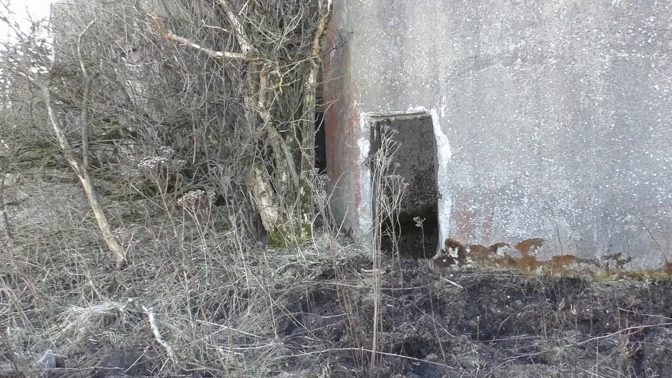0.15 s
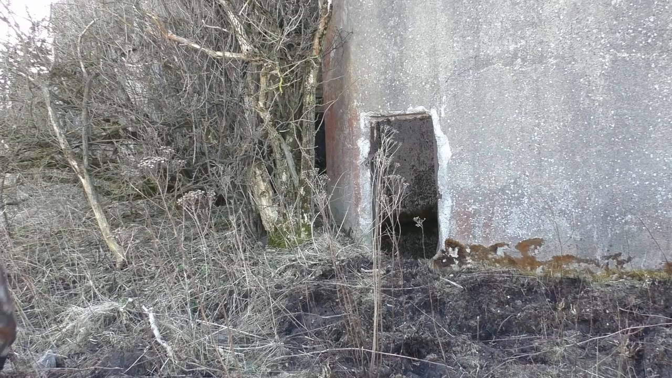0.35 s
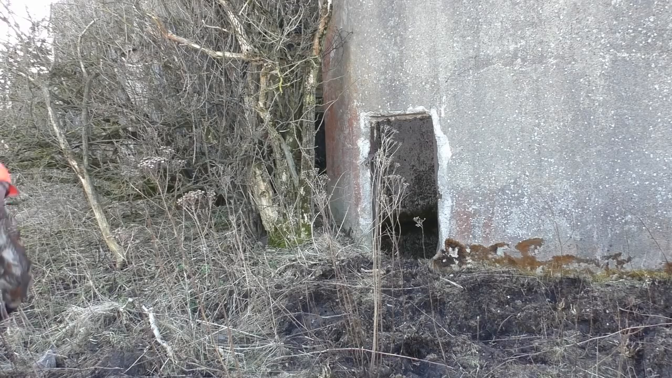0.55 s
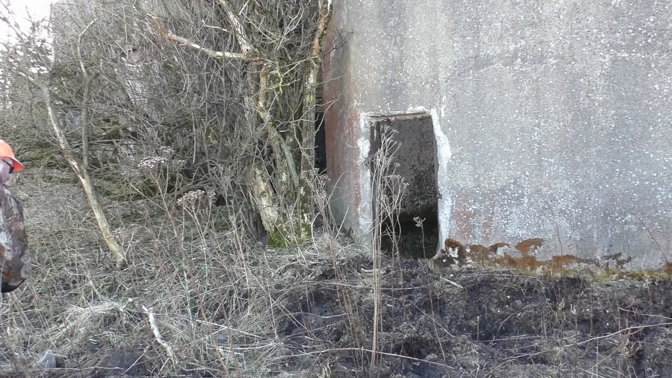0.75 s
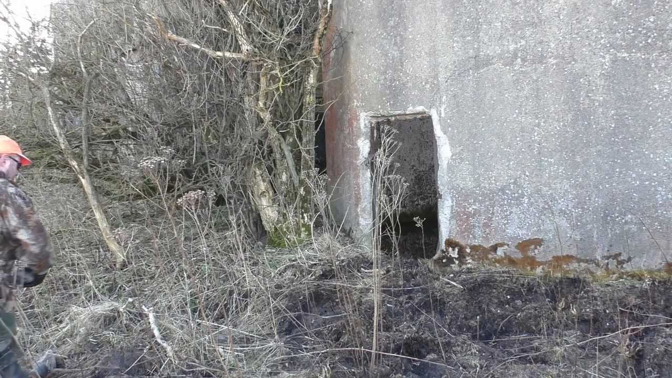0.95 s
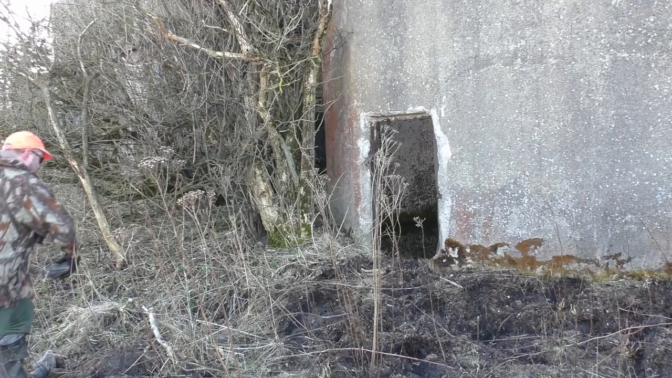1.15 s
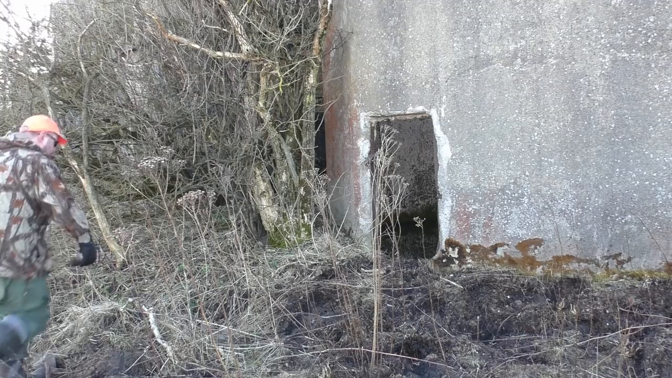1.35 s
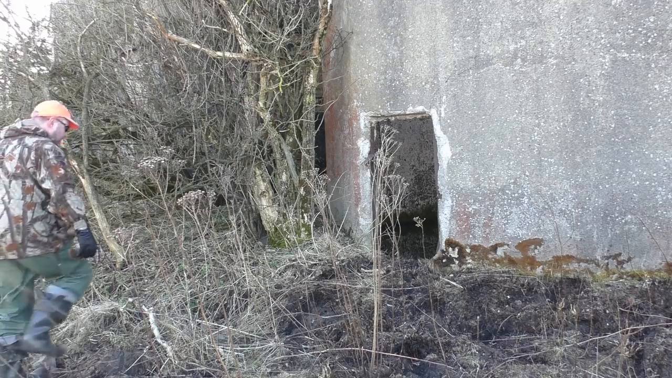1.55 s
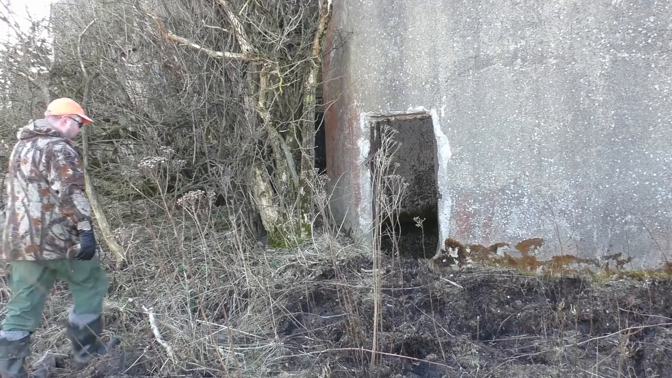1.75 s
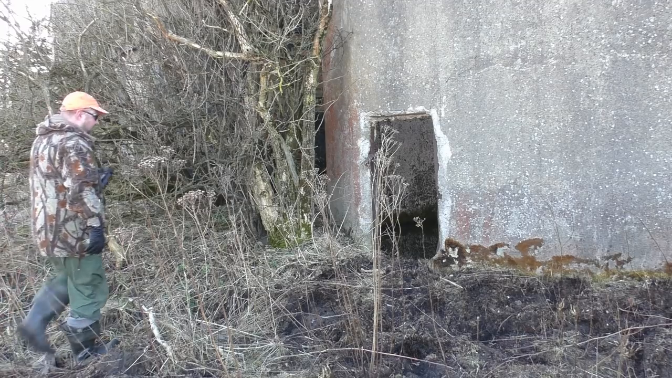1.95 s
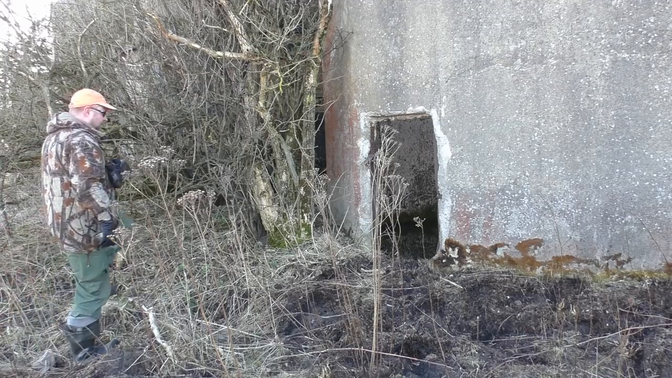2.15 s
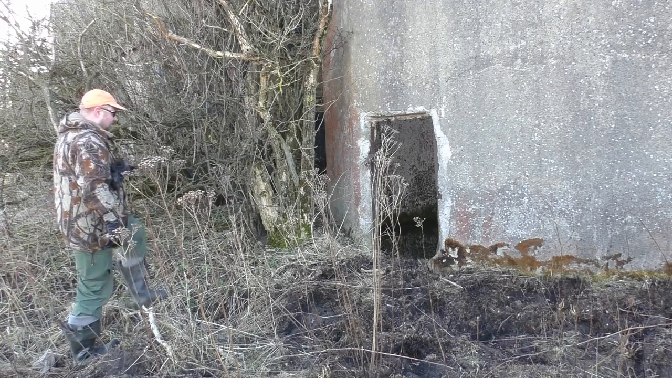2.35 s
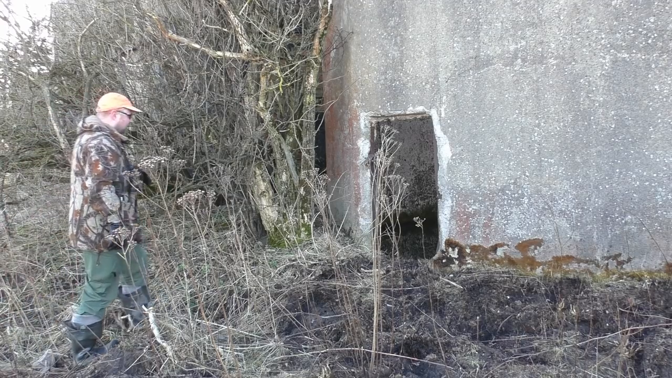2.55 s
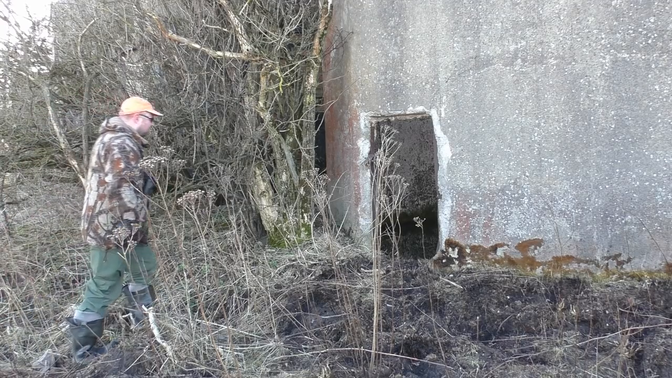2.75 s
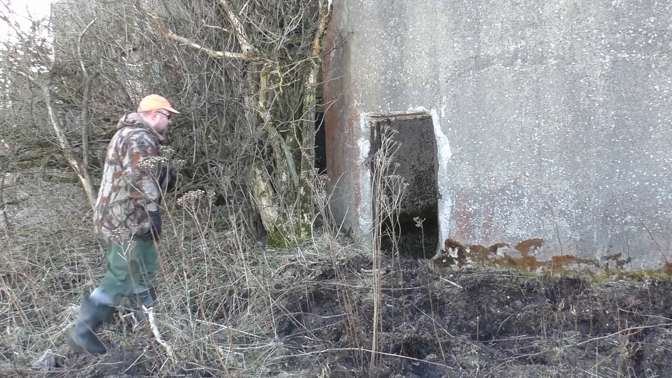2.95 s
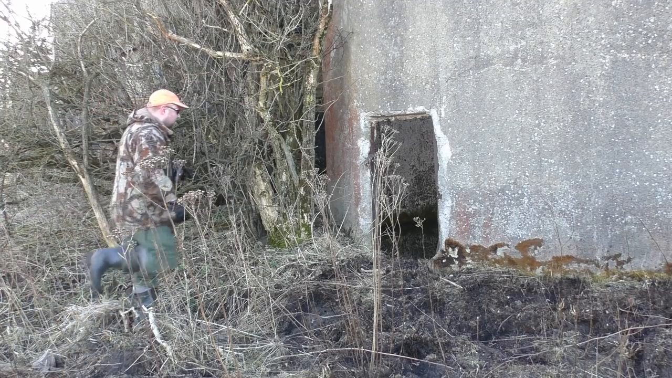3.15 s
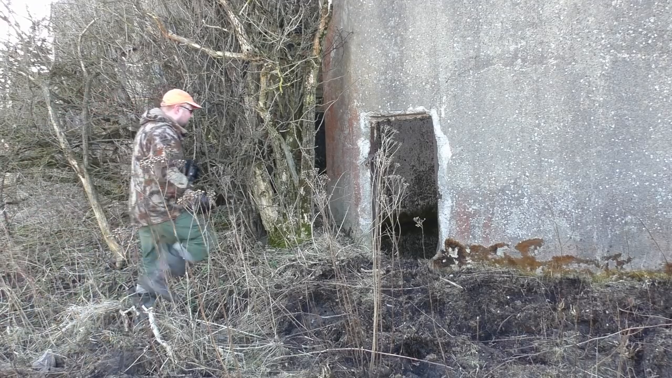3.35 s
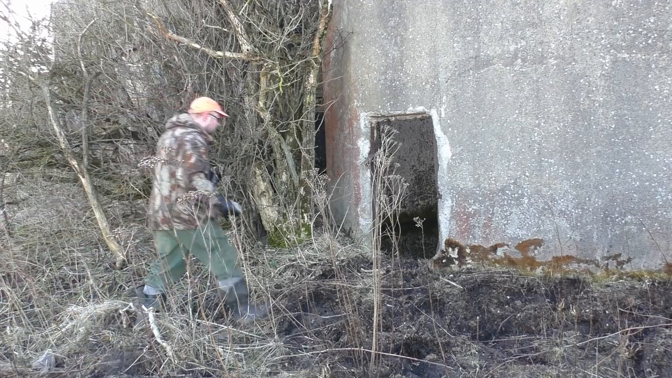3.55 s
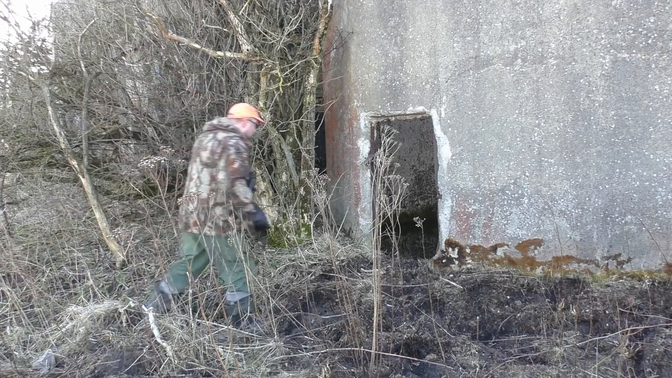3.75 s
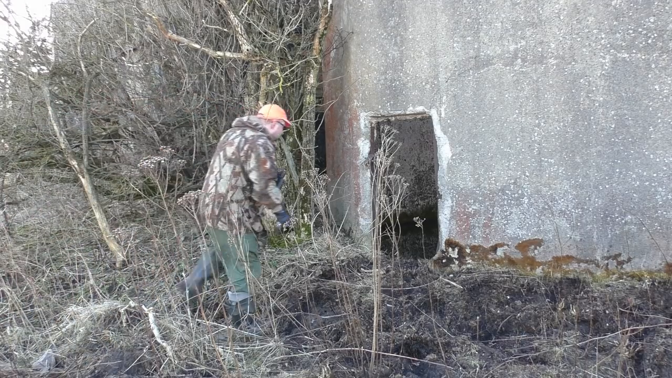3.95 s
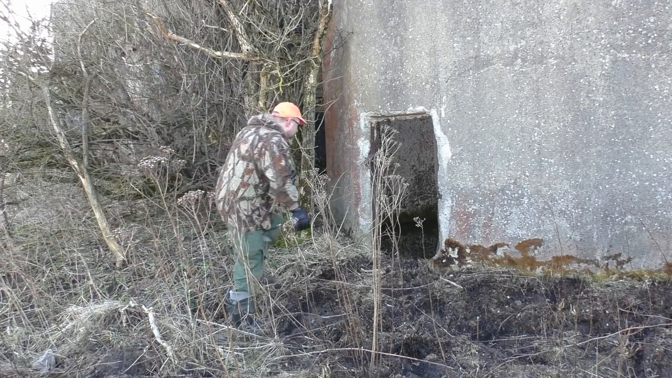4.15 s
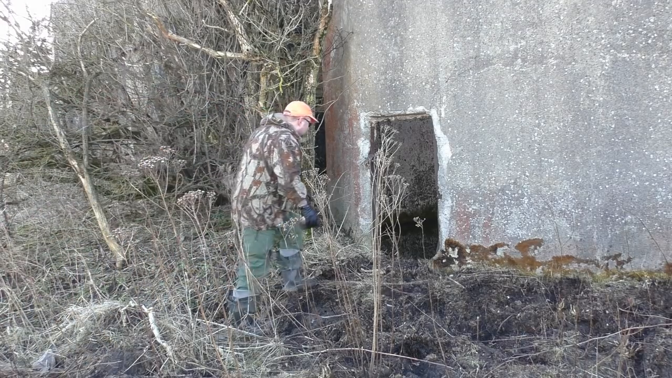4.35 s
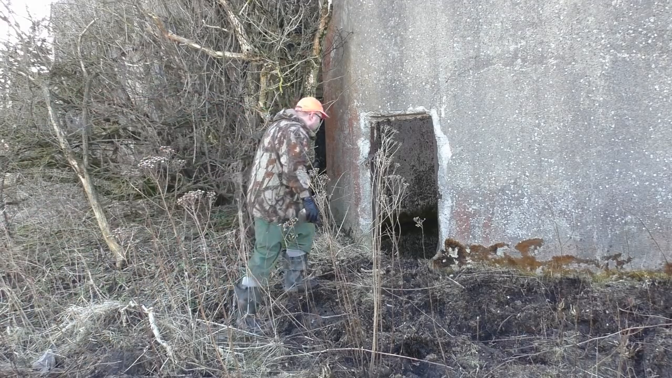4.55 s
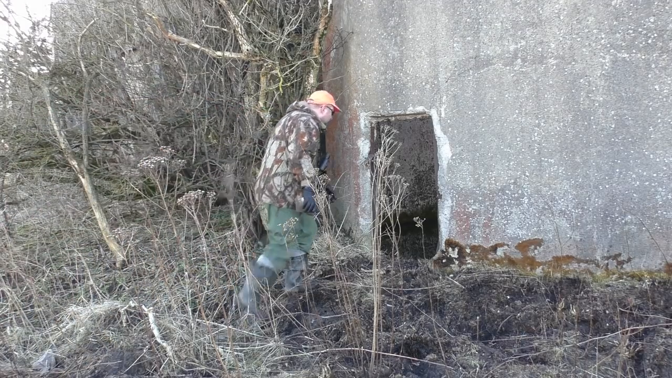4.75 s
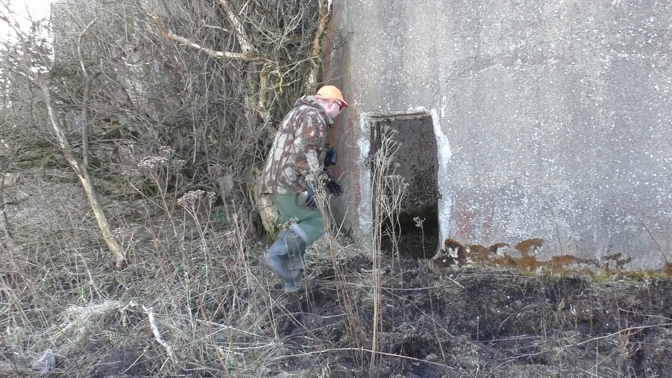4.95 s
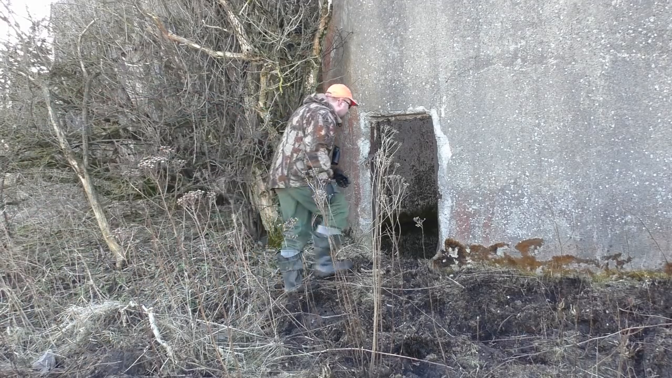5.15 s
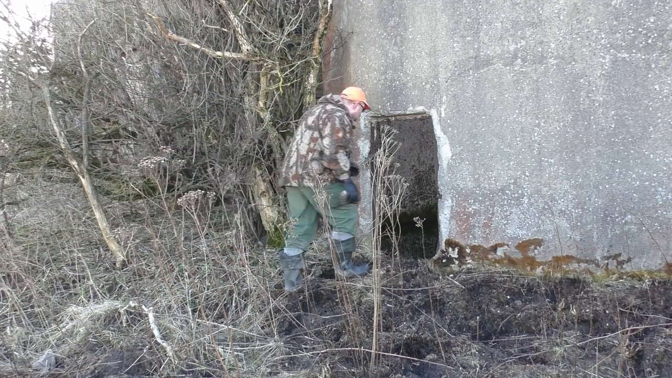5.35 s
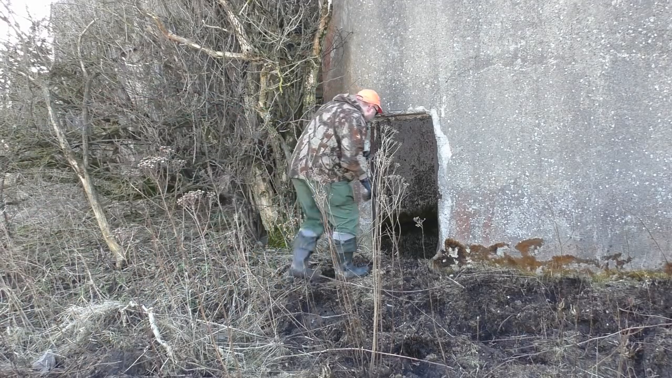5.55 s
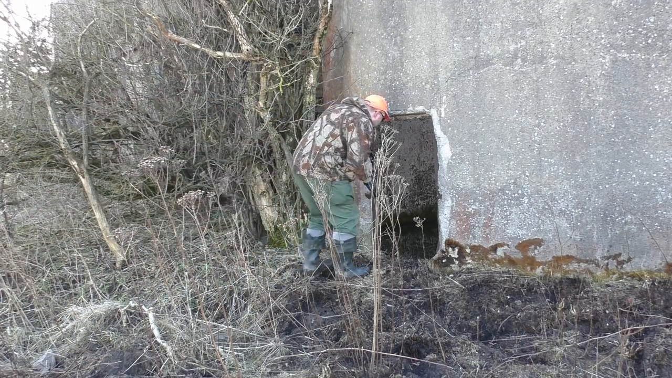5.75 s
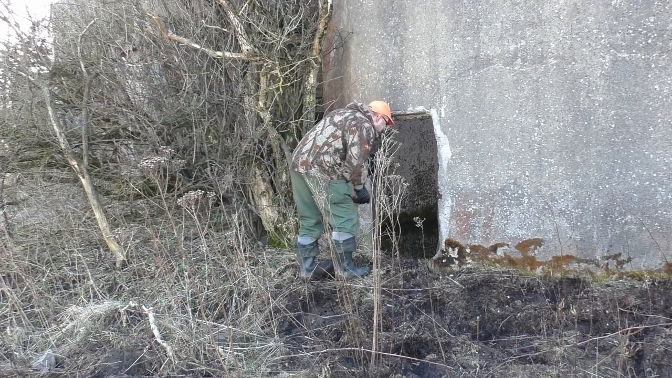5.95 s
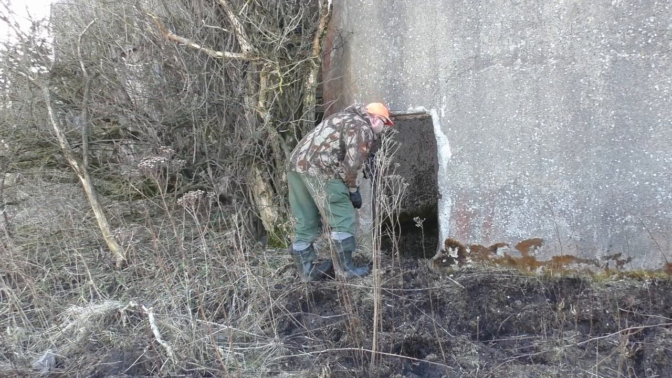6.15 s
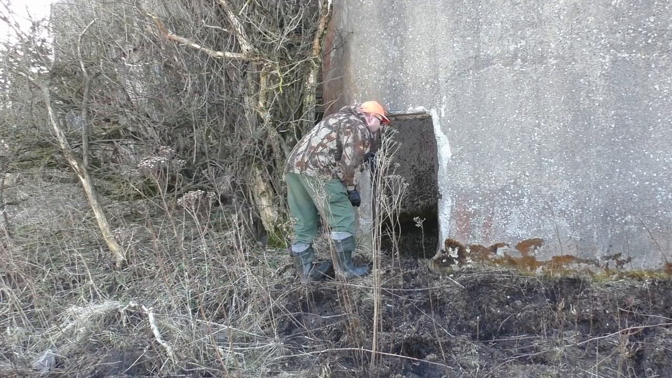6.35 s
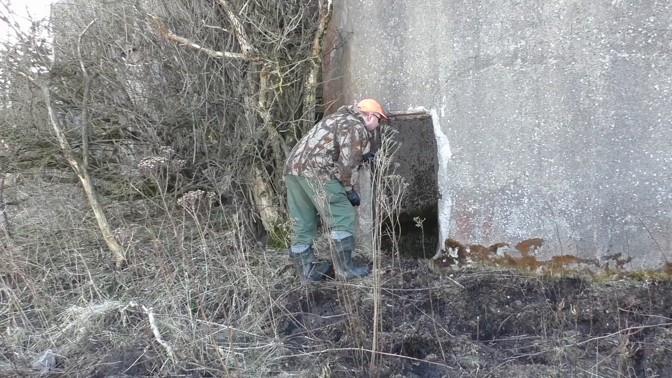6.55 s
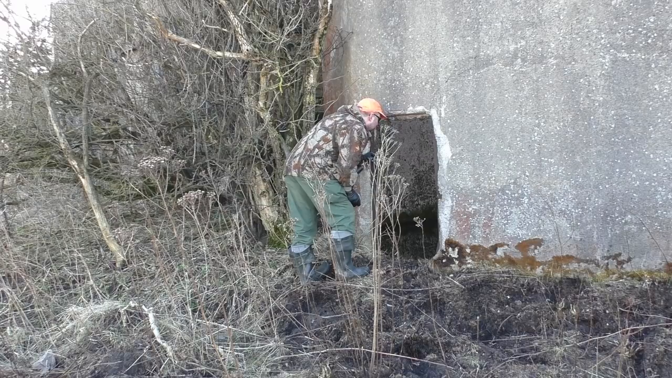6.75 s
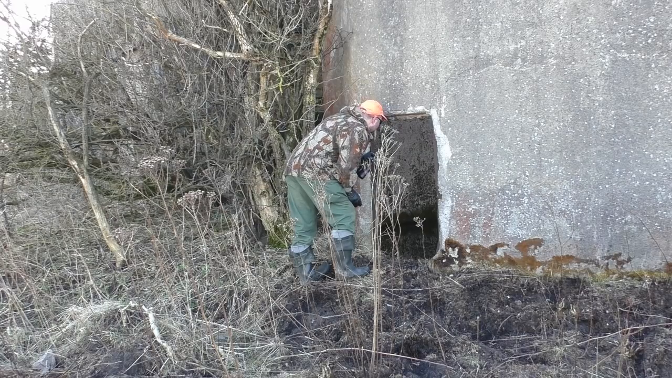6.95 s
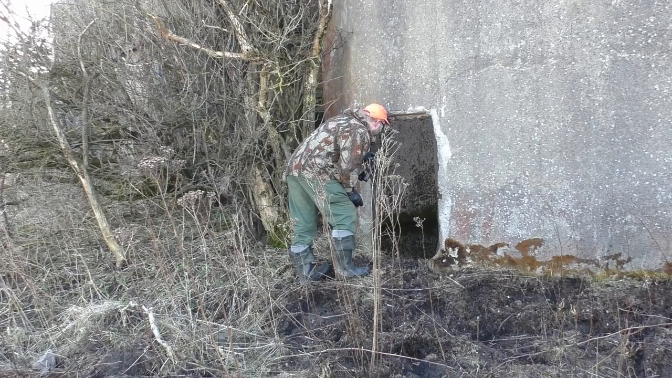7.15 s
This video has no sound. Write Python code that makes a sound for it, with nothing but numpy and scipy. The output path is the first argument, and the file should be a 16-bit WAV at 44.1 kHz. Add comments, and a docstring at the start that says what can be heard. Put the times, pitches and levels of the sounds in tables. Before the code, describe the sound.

Quiet countryside hum with a brief low drone at the start, then crisp, uneven steps through brittle undergrowth: rustling blades, crushed stalks, loud dry snaps, muffled footfalls. The walker approaches from the left and halts near the middle. Far songbirds whistle faintly early and sing falling, pip-like slides and buzzes near the end. Small stereo camera outdoors.

```python
"""A low country hum with a faint hiss lies under everything; a drone is there at first and soon drops.
Hum, hiss and drone are noise shaped by pitch.
Boots walk through dry grass and brambles towards a concrete wall, from the left to near the centre.
Stalks rustle (noise and tiny damped sines), twigs snap (noise bursts), soles thud (low fading sines).
Far songbirds whistle, slide down and buzz (gliding tones, scrub echo); a small stereo camera listens."""
import sys
import numpy as np
from scipy import signal
from scipy.fft import rfft, irfft, next_fast_len
from scipy.io import wavfile
from scipy.ndimage import uniform_filter1d, map_coordinates

SR = 44100
rng = np.random.default_rng(int(sys.argv[2]) if len(sys.argv) > 2 else 0)


def to_wav(sig):
    """Store sig (one row per channel, or 1-D mono) as 16-bit WAV at the path in sys.argv[1].

    Samples outside -1..1 are clipped; the rate is SR.
    """
    pcm = np.clip(np.atleast_2d(sig), -1, 1) * 32767
    pcm = np.round(pcm).astype(np.int16)
    wavfile.write(sys.argv[1], SR, pcm.T)  # frames by channels


N = 317520


def amp(db):
    """Turn decibels into a plain multiplier."""
    return 10 ** (np.asarray(db) / 20)


def unit(x):
    """Scale a sound to an average (rms) strength of 1."""
    return x / np.sqrt(np.mean(x ** 2) + 1e-20)


def along(points, hz):
    """Read a curve of (pitch_hz, value) points at any pitch, on a log pitch axis."""
    point_hz, value = np.transpose(points)
    return np.interp(np.log(hz + 1), np.log(point_hz + 1), value)


def curves(rows):
    """Draw straight lines between timed rows: one value per sample for each column after the time."""
    time_s, *columns = np.transpose(rows)
    return [np.interp(np.arange(N) / SR, time_s, column) for column in columns]


def wobble(rate):
    """A smooth random curve through `rate` random points a second."""
    points = rng.standard_normal(int(N * rate / SR) + 4)
    return map_coordinates(points, [np.arange(N) * rate / SR])


def filtered(x, response):
    """Change the strength and timing of each pitch in x by a response that depends on pitch."""
    size = next_fast_len(N + SR // 4)
    hz = np.fft.rfftfreq(size, 1 / SR)
    return irfft(rfft(x, size) * response(hz), size)[..., :N]


def rush(spectrum, alike):
    """Stereo noise of rms 1: a shared part and an opposite part set how alike the two ears are."""
    def shares(hz):
        turn = np.arccos(np.clip(along(alike, hz), -1, 1)) / 2
        return amp(along(spectrum, hz)) * [np.cos(turn), np.sin(turn)]

    mid, side = filtered(rng.standard_normal((2, N)), shares)
    return unit(np.array([mid + side, mid - side]))


def field():
    """Distant hum and hiss drift a little in level, over a low drone far off."""
    # tone of the hum and hiss: pitch_hz, level_db (relative, per Hz)
    hum_shape = [(15, -29.5), (40, -21.5), (90, 6), (300, 5), (500, -4), (720, -13), (1100, 1), (2500, -3),
                 (4000, -6.5), (5500, -23.5), (7000, -30), (10000, -17.5), (14800, -16)]
    # how alike left and right are: pitch_hz, likeness (1 = the same)
    far_alike = [(60, 0.38), (240, 0.07), (930, 0.43), (3660, 0.14), (14400, 0.41)]
    # the drone's level before its 6 dB lift: time_s, level_db
    drone_levels = [(0.0, -66.5), (0.2, -75.5), (5.98, -75), (7.2, -79)]
    # tone of the drone: pitch_hz, level_db (relative)
    drone_shape = [(30, -5.5), (65, 4.5), (80, -15.5), (87, 15.5), (95, -16), (130, -20), (200, -50.5)]
    drone_db, = curves(drone_levels)
    hum = amp(-63 + 0.79 * wobble(6.7)) * rush(hum_shape, far_alike)
    drone = amp(drone_db + 6.0) * rush(drone_shape, far_alike)
    return hum + drone


def crushing():
    """Basic levels of blades and stalks: an uneven rustle plus crunches that swell, hold and die away."""
    # uneven background rustle under the crunches, rising and sinking: time_s, blades_db, stalks_db
    background = [(0.0, -91, -67), (0.18, -75, -64.5), (0.3, -63.5, -56.5), (0.8, -68, -56.5),
                  (1.05, -52.5, -51.5), (1.6, -57.5, -53.5), (2.2, -54.5, -49.5), (2.37, -82, -62),
                  (2.55, -58, -55), (2.95, -65, -64.5), (3.2, -60, -50), (3.8, -48, -56.5),
                  (4.3, -65, -55.5), (4.55, -58, -52.5), (4.8, -75.5, -58), (5.3, -54.5, -59.5),
                  (5.55, -66.5, -62), (5.9, -59, -57.5), (6.1, -68.5, -71), (7.2, -76, -77.5)]
    # tufts crushed or dragged by a boot: peak_s, blades_peak_db, stalks_peak_db, hold_s
    crunches = [(0.375, -58.5, -68, 0.0071), (0.55, -64, -58.5, .04), (0.666, -54.5, -53, 0.011),
                (1.076, -77, -59.5, 0.061), (1.19, -72.5, -57, 0.0091), (1.371, -31.5, -54, .002),
                (1.502, -41.5, -56, .01), (1.647, -44, -49, 0.14), (1.83, -40, -48.5, 0.034),
                (2.011, -44, -44.5, 0.0075), (2.065, -40, -61, 0.0091), (2.167, -41, -48.5, 0.013),
                (2.435, -53, -53, 0.02), (2.634, -47, -49.5, 0.045), (3.06, -53.5, -51.5, 0.031),
                (3.137, -43.5, -49, 0.011), (3.244, -60, -46.5, 0.0079), (3.424, -40, -39.5, 0.012),
                (3.655, -50.5, -59, 0.04), (3.771, -48, -42, .01), (3.811, -42, -48.5, 0.014),
                (4.145, -52, -55.5, 0.054), (4.386, -52, -56, 0.026), (4.445, -45.5, -48.5, 0.015),
                (4.612, -50, -89, .01), (4.723, -48, -55, 0.0089), (4.855, -55.5, -64.5, 0.036),
                (4.956, -62.5, -57.5, 0.045), (5.06, -58, -57.5, 0.012), (5.21, -39.5, -48, 0.013),
                (5.372, -50, -49.5, 0.013), (5.504, -57, -68, .005), (5.817, -43.5, -62.5, 0.009),
                (5.885, -50.5, -55.5, .01), (6.225, -66, -61.5, 0.045), (6.469, -66, -77.5, .02)]
    rise_db_per_s = 378
    fall_db_per_s = np.array([[200], [136]])  # blades, stalks
    power, t = amp(2 * np.array(curves(background))), np.arange(N) / SR
    for peak_s, blade_db, stalk_db, hold_s in crunches:
        span = slice(max(round((peak_s - .2) * SR), 0), round((peak_s + .5) * SR))
        early_s = np.maximum(peak_s - t[span], 0)
        late_s = np.maximum(t[span] - peak_s - hold_s, 0)
        peak_db = np.array([[blade_db], [stalk_db]])
        power[:, span] += amp(2 * (peak_db - rise_db_per_s * early_s - fall_db_per_s * late_s))
    return 10 * np.log10(power)


def patchy(x, depth_db):
    """Random patches of gain: the rustle's colour varies at random over time and pitch."""
    z = signal.stft(x, nperseg=256)[2]
    patches = uniform_filter1d(rng.standard_normal(z.shape[1:]), size=6, axis=0)  # smooth over pitch
    patches = uniform_filter1d(patches, size=8, axis=1)  # smooth over time
    return unit(signal.istft(z * amp(depth_db * unit(patches)), nperseg=256)[1][:, :N])


def grains(count, size, hz, spread, cycles, spike_db, scatter_db):
    """Damped sines at random times, pitches and sizes, leaning right by random amounts; stereo, rms 1."""
    when, pitch, big, place = rng.random((count, 4)).T
    pitch = np.clip(hz * np.exp(spread * (2 * pitch - 1)), 30, SR / 2.5)[:, None]
    turns = pitch * np.arange(size) / SR
    loudness = amp(-spike_db * np.log(1 - .985 * big))[:, None]  # many small grains, a few big ones
    shape = np.sin(2 * np.pi * turns) * np.exp(-turns / cycles) * loudness
    at = ((when * N).astype(int)[:, None] + np.arange(size)).ravel()
    ears = [shape * amp(sign * scatter_db * (place - 1.0))[:, None] for sign in (1, -1)]
    return unit(np.array([np.bincount(at, ear.ravel(), N + size)[:N] for ear in ears]))


def rustle():
    """Blades, stalks and soil give way in clumps of grains over a rush of finer noise."""
    # tone of the dry blades: pitch_hz, level_db (relative)
    blade_shape = [(2500, -3.5), (5000, 7), (8000, 8), (12000, 4.5), (14500, 1.5), (16000, -15)]
    # tone of the stalks: pitch_hz, level_db (relative)
    stalk_shape = [(500, -13.5), (1000, -3), (1500, -4.5), (3000, -6), (5000, -15), (8000, -18.5)]
    # tone of the soil: pitch_hz, level_db (relative)
    soil_shape = [(50, -34), (100, -3), (220, -1), (400, 2.5), (700, -17.5)]
    # how alike left and right are close by: pitch_hz, likeness (1 = the same)
    near_alike = [(60, 0.43), (240, 0.31), (930, 0.97), (3660, 0.92), (14400, 0.99)]
    blade_db, stalk_db = crushing()
    clump = wobble(45)

    blades = 0.57 * patchy(rush(blade_shape, near_alike), depth_db=3.5)
    blades += 0.51 * grains(count=9000, size=48, hz=9360, spread=0.67, cycles=1.6,
                            spike_db=8.5, scatter_db=4)
    stalks = 0.73 * patchy(rush(stalk_shape, near_alike), depth_db=3.0)
    stalks += 0.53 * grains(count=3500, size=256, hz=2047, spread=0.72, cycles=1.56,
                            spike_db=3.5, scatter_db=3.5)
    soil = 1.18 * rush(soil_shape, [(100, 0.49), (500, 1.0)])
    soil += 1.21 * grains(count=500, size=1500, hz=230, spread=0.73, cycles=1.0,
                          spike_db=4.5, scatter_db=6)

    blades *= amp(blade_db + 2.0 + 4.7 * clump)
    stalks *= amp(stalk_db + 1.23 + 2.03 * clump + 2.2 * wobble(30))
    soil *= amp(0.78 * stalk_db - 22.0 + 2.8 * clump)  # it gives under the same weight as the stalks
    return blades + stalks + soil


def calls(rows, rate, swing_hz, paired, edge_db, loudest):
    """One pure tone a call glides through three pitches, warbles `rate` times a second and swells once."""
    song, t = np.zeros(N), np.arange(N) / SR
    for start_s, length_s, start_hz, middle_hz, end_hz, db in rows:
        part = (t - start_s) / length_s  # 0 at the start of the call, 1 at its end
        beat = rate * (t - start_s) % 1
        glide = np.polyfit([0, .5, 1], [start_hz, middle_hz, end_hz], 2)
        pitch = np.polyval(glide, np.clip(part, 0, 1))
        level_db = db - edge_db * np.interp(part, [0, loudest, 1], [1, 0, 1]) ** 2
        gate = np.clip(np.minimum(part, 1 - part) * length_s / 0.0062, 0, 1)  # 6.2 ms fades
        if paired:
            swell = np.sin(3 * np.pi * beat) ** 2 * (beat < 2 / 3)  # two pips, then a rest
        else:
            swell = 1 - .3 * (rate > 0) * np.cos(np.pi * beat) ** 2  # warbles fade at their low end
        # nearly straight up and down, reaching about 1.2 either way
        swing = np.arcsin(.93 * np.cos(2 * np.pi * beat * (3 if paired else 1)))
        tone = np.sin(2 * np.pi * np.cumsum(pitch - swing_hz * swing) / SR)
        song += np.sqrt(2) * amp(level_db + 1.4 * wobble(42)) * gate * swell * tone
    return song


def birds():
    """Plain whistles, slides in pairs of short pips and buzzes of fast warbles; scrub scatters them."""
    # Columns of all three: start_s, length_s, start_hz, middle_hz, end_hz, level_db (before the final mix)
    # whistles and chips
    whistles = [(.072, .11, 2150, 2484, 1780, -64), (.58, .035, 3200, 2900, 2450, -64),
                (2.338, 0.021, 4900, 4450, 4100, -68), (2.36, 0.017, 3000, 3850, 4000, -57.5),
                (2.386, .013, 3000, 3470, 3200, -63), (2.4, 0.013, 3100, 2970, 2900, -63),
                (2.74, .09, 4120, 3640, 3370, -65)]
    # falling slides sung in paired pips
    slides = [(5.15, .31, 3950, 2910, 2120, -56.5), (6.1, 0.33, 4020, 2950, 2155, -59.5),
              (6.9675, .27, 4330, 3150, 1910, -57.5)]
    # warbled buzzes
    buzzes = [(5.558, .39, 3360, 3410, 3240, -63), (6.5076, 0.3, 3190, 3280, 3510, -64.5)]
    # edge_db: how much quieter both ends are; loudest: share of the call gone by at its loudest
    song = calls(whistles, rate=0, swing_hz=0, paired=False, edge_db=4, loudest=0.66)
    song += calls(slides, rate=35, swing_hz=218, paired=True, edge_db=10, loudest=0.64)
    song += calls(buzzes, rate=64, swing_hz=620, paired=False, edge_db=1.5, loudest=0.66)
    # the echo is noise that falls 60 dB in 0.17 s
    tail = rng.standard_normal((2, SR // 3)) * amp(-60 * np.arange(SR // 3) / SR / 0.17)
    echo = signal.fftconvolve(song[None], tail / np.linalg.norm(tail[0]), axes=1)[:, :N]
    return song * amp([[.7], [-.7]]) + amp(-3.5) * echo  # direct song slightly to the left


def snaps():
    """A sharp crack, a crackle of splitting fibres after it, and a short ring of the stem."""
    # twigs that snap, before the lifts below: start_s, crack_peak_db, ring_db (relative to crack), ring_hz
    twigs = [(0.223, -33, -10, 2370), (0.319, -49, 4, 5970), (0.5625, -46, -2, 1350),
             (0.681, -31.5, -16.5, 1140), (0.718, -38.5, -5, 3000), (0.853, -44.5, -8, 3500),
             (0.9623, -25.5, -12.5, 2870), (1.005, -34, -10, 2460), (1.0256, -40, 0.5, 3060),
             (1.046, -28.5, -20, 1250), (1.065, -33, -21.5, 1180), (1.089, -29.5, -8, 5600),
             (1.1829, -30.5, -4, 5600), (1.2043, -27, -20, 3640), (1.2828, -19, -19.5, 1120),
             (1.352, -3, -16.5, 2400), (1.5059, -15, -20.5, 2150), (1.5995, -25, -21, 1090),
             (1.6538, -28, -16, 1510), (1.6603, -28, -27, 2000), (1.6698, -27.5, -6, 4220),
             (1.699, -25, -34, 1510), (1.745, -24, -17, 1330), (1.762, -31, -20, 1500),
             (1.7674, -18.5, -31, 1370), (1.8224, -28, -7, 4700), (1.8976, -21, -20, 1250),
             (1.9994, -25, -19, 2900), (2.0551, -7.5, -14.5, 2600), (2.1224, -31, -0.5, 980),
             (2.161, -33, -5, 2260), (2.2247, -26.5, -27, 2060), (2.417, -31, 2.5, 1690),
             (2.5022, -42.5, 13, 1210), (2.5844, -25.5, -10, 1750), (2.6218, -19.5, -13, 2380),
             (2.6671, -21, -15, 1920), (2.6952, -27.5, -13, 3800), (3.0433, -36, 1, 3350),
             (3.121, -26.5, -34, 1630), (3.157, -20.5, -44, 1720), (3.2491, -40.5, 9.5, 1910),
             (3.4094, -24, -1.5, 2570), (3.429, -23.5, -15, 1420), (3.5418, -30, -23, 1170),
             (3.5895, -38.5, 3, 1340), (3.6268, -32, -23, 1720), (3.6443, -25.5, -27, 2250),
             (3.7028, -39.5, 3, 1380), (3.7531, -39, 8.5, 3780), (3.798, -26.5, -12.5, 1820),
             (3.805, -8.5, -15, 3830), (3.8237, -18.5, -10, 3900), (3.8679, -22, -13, 1800),
             (3.9279, -22, -15, 4230), (4.123, -20.5, -15, 3000), (4.1758, -42.5, 2.5, 1240),
             (4.369, -32, -10, 1900), (4.451, -19, -30, 1050), (4.47, -29, -3.5, 1640),
             (4.6173, -8.5, -19.5, 1420), (4.7254, -11, -14, 3100), (4.7503, -16.5, -14, 3860),
             (4.8256, -51.5, 7, 1230), (4.9027, -46.5, 1.5, 1850), (5.0741, -25.5, -11.5, 3540),
             (5.153, -41, -8, 1500), (5.2117, -18, -18, 1670), (5.227, -24.5, -19, 1570),
             (5.2754, -18, -14, 2000), (5.3801, -36, 0.5, 1880), (5.4094, -24.5, -17, 3550),
             (5.498, -31, -11.5, 1420), (5.5963, -35, -18, 1020), (5.627, -53, 7, 2000),
             (5.672, -45.5, 1.5, 1210), (5.7367, -49, 6.5, 1830), (5.774, -44, 4, 1500),
             (5.813, -14.5, -18, 3870), (5.854, -36.5, -6, 3400), (5.9, -29, -15, 1510),
             (5.945, -36, -16, 2110), (6.172, -29.5, -19, 1460), (6.4063, -45, -5, 2660),
             (6.4646, -31.5, -14.5, 1650), (6.518, -60, 7.5, 1990), (6.7685, -62.5, 11, 1800)]
    crack_t60_s, fibres_t60_s, answer_t60_s = 0.0039, 0.022, 0.11  # time to fall by 60 dB
    crack, wood, t = np.zeros((2, N + SR)), np.zeros((2, N + SR)), np.arange(SR // 5) / SR
    snap = amp(-60 * t / crack_t60_s)
    answer = amp(-29.0 - 60 * t / answer_t60_s)  # wall and scrub answer
    onset = (1 - np.exp(-t / 0.00032)) ** 2
    bright = signal.butter(2, [4800, 13000], "band", fs=SR)
    for start_s, db, ring_db, hz in twigs:
        noise = rng.standard_normal((4, len(t)))
        pair = noise[0] + 0.18 * noise[1:3]  # each ear hears a slightly different twig
        ticks = amp(10.8 * uniform_filter1d(noise[3], size=24) * np.sqrt(24))  # fibres part one by one
        fibres = amp(-21.0 - 60 * t / fibres_t60_s) * ticks
        burst = pair * onset * (snap + fibres + answer)
        start = round(start_s * SR)
        span = slice(start, start + len(t))
        edge = signal.lfilter(*bright, burst)
        crack[:, span] += amp(db + 1) * edge / np.abs(edge).max()
        ring = signal.lfilter(*signal.iirpeak(hz, 1.8, SR), burst)
        wood[:, span] += amp(db + ring_db + 8.5) * ring / np.abs(ring).max()
    return crack[:, :N] + wood[:, :N]


def thuds():
    """Soft soil swings low and dies fast under each sole; a stem pressed down knocks with it."""
    # soles on soil, before the trims below: start_s, peak_db, pitch_hz, knock_db (relative to peak)
    soles = [(0.56, -38.5, 210, -14), (1.078, -38, 227, -23), (1.189, -46, 220, -12),
             (1.276, -42.5, 356, 1.5), (1.35, -38, 274, -9.5), (1.662, -41, 423, -5),
             (1.882, -27.5, 236, -13), (2.005, -30.5, 207, -12), (2.055, -44, 430, 7),
             (2.088, -41.5, 396, 2), (2.417, -45, 304, 2), (2.496, -40.5, 158, -13), (2.63, -52, 375, -23),
             (3.042, -44.5, 111, -3), (3.083, -46, 151, -18), (3.412, -34, 406, 3), (3.705, -29, 139, -8.5),
             (3.866, -39.5, 169, -14), (4.029, -41, 396, -2), (4.448, -34, 268, -14), (4.618, -42, 440, 5),
             (5.274, -42, 293, -17), (5.809, -49, 432, -3), (5.884, -42.5, 226, -11)]
    out, t = np.zeros(N + SR), np.arange(SR // 8) / SR
    body = signal.butter(2, [450, 1300], "band", fs=SR)
    stages_db = 8.0 * np.cos(2 * np.pi * t / 0.017)  # heel and sole sink in stages
    weight = amp(-60 * t / 0.074 + stages_db) * (1 - np.exp(-t / 0.0015))
    for start_s, db, hz, knock_db in soles:
        push = np.sin(2 * np.pi * hz * t) * weight
        knock = signal.lfilter(*body, rng.standard_normal(len(t)) * amp(-60 * t / 0.056))
        thud = push / push.max() + amp(knock_db + 6) * knock / np.abs(knock).max()
        out[round(start_s * SR):][:len(t)] += amp(db - 1.5) * thud
    return out[:N]


def dipped(x):
    """The path from the grass to the microphone weakens a few bands and carries little deep bass."""
    # ground echo and housing: centre_hz, width_hz, depth_db
    dips = [(805, 390, -5.5), (6900, 1720, -8.5), (5100, 1000, -3.5)]

    def notch(f, centre, width, db):
        rest = centre * centre - f * f
        return (rest + 1j * f * width * amp(db)) / (rest + 1j * f * width)

    def path(f):
        low_cut = (1j * f / (80 + 1j * f)) ** 2
        return np.prod([notch(f, *row) for row in dips], axis=0) * low_cut

    return filtered(x, path)


def scene():
    """Place the walker from left to near the centre, then add the birds and the far field."""
    # the walker's place: time_s, left_minus_right_db
    walk = [(0, 4), (2.2, 4), (3.7, 2.2), (4.3, 1.2), (7.2, 1)]
    far = field()
    pan_db, = curves(walk)
    walker = (rustle() + snaps() + thuds()) * amp([pan_db / 2, -pan_db / 2])
    return dipped(walker) + birds() + far


def record(dry):
    """The two ports differ a little; the camera keeps almost nothing above its band limit."""
    # difference of the ports: pitch_hz, left_minus_right_db
    port_gap = [(100, 1), (300, 0.5), (8000, 0), (13000, 3)]
    top_hz = 14550

    def response(hz):
        gap_db = along(port_gap, hz)
        slope = np.clip((top_hz + 50 - hz) / 300, 0, 1)
        faint = amp(-44) * (hz < 16500)  # a trace above the limit, then nothing
        return amp([gap_db / 2, -gap_db / 2]) * np.where(hz < top_hz, slope, faint)

    return filtered(dry, response)


dry = scene()
out = record(dry)
to_wav(out)
```